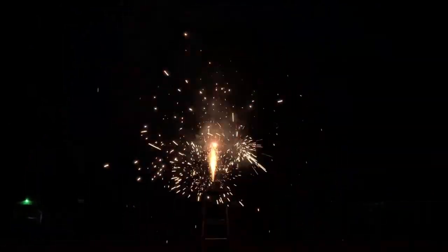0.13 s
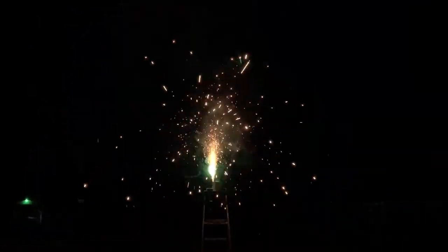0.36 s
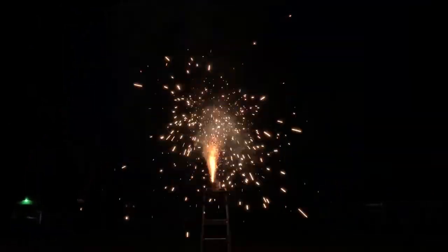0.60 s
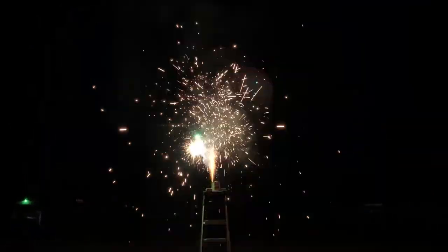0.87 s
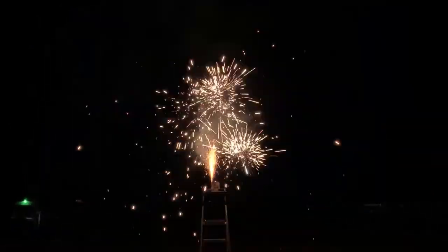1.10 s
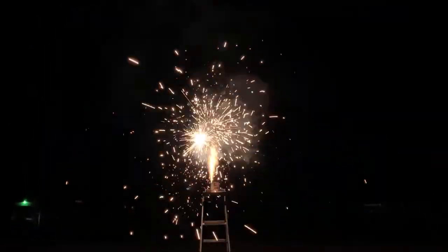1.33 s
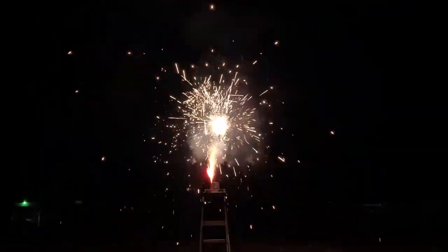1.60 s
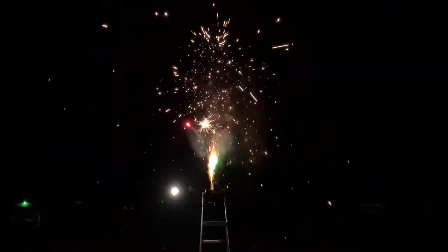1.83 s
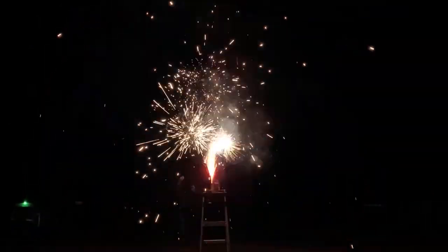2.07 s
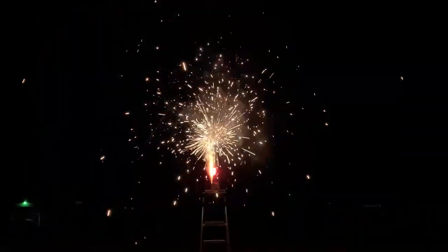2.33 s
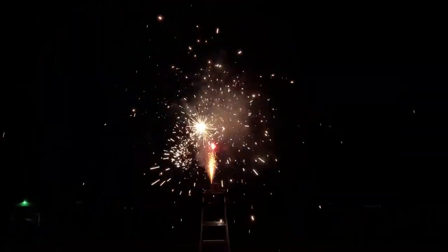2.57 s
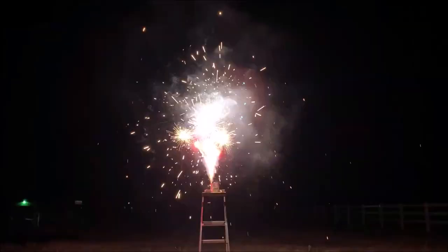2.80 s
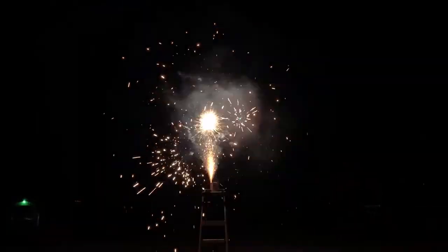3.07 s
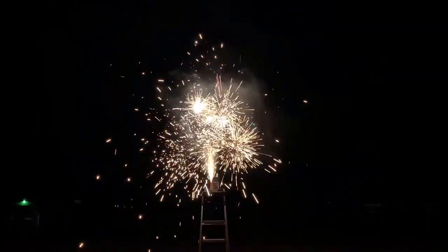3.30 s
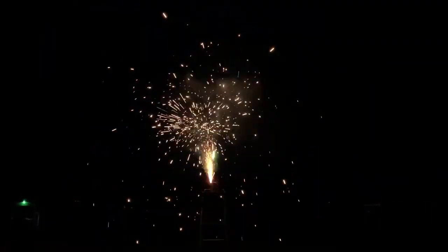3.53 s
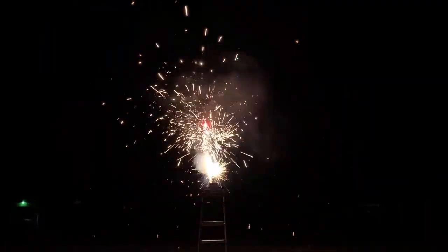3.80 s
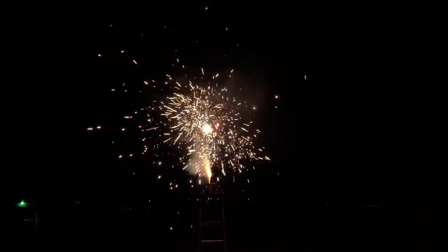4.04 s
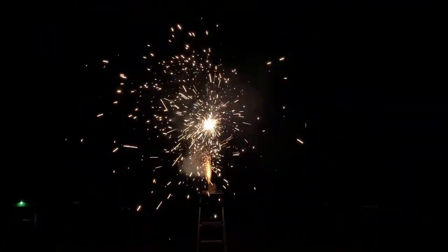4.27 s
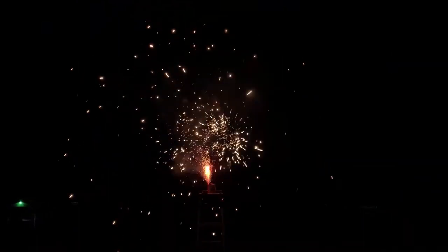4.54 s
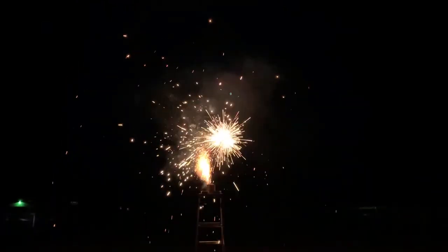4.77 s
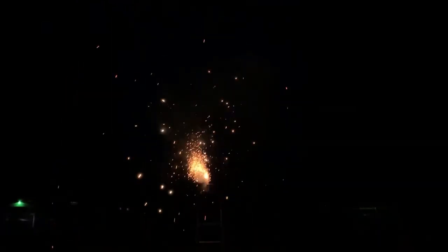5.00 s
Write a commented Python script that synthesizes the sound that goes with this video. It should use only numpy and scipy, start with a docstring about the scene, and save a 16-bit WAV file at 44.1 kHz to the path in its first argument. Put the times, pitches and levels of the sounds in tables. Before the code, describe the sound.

A crackling firework fountain is heard outdoors at night from some metres away, in stereo. From the first instant, sharp, dry, bright snaps come in irregular rapid fire, around forty a second, single or in tight clusters, varying from small ticks to hard loud cracks. Each is doubled by a ground bounce a few milliseconds later, too close to hear apart, with a brief scattered tail and a faint slap from walls about 65 milliseconds behind. Tiny shards tick quietly after some. Especially strong cracks come near 1.7, 2.9, 3.4 and 3.7 seconds. Soft bass thumps sit under the crackle at about 0.2, 0.4, 1.1, 1.4, 1.6, 2.5, 3.0 and 3.4. A thin, grainy, flickering hiss and very faint low roar continue far beneath. After 4.5 seconds the cracks are sparser; the last strong one comes at 4.98, then the hiss drops, leaving a fading echo and one tiny tick at 5.13.

```python
"""Crackling stars burst above a ground fountain firework at night, some metres from two microphones.
Each star is a sharp shock, heard straight and again off the ground 1-3 ms later; some throw a small shard
that pops just after. Nearby clutter scatters the shocks and two walls return them faintly.
Shaped noise makes a thin hiss and the low roar of the jet; filtered pulses make soft bass thumps.
The hiss thins slowly, then drops near the end as the fountain dies."""
import sys
import numpy as np
from scipy import signal
from scipy.fft import rfft, irfft, next_fast_len
from scipy.io import wavfile
from scipy.ndimage import uniform_filter1d, minimum_filter1d

SR = 44100
rng = np.random.default_rng(int(sys.argv[2]) if len(sys.argv) > 2 else 0)


def wav_out(sig):
    """Save sig, one row per channel (or a flat mono array), as 16-bit PCM at SR to the path in sys.argv[1]."""
    wavfile.write(sys.argv[1], SR, np.round(np.clip(np.atleast_2d(sig).T, -1, 1) * 32767).astype(np.int16))


def makeup_ratio(level_db):
    """Linear amplitude ratio for a level in decibels (20 dB per factor of ten)."""
    decades = np.asarray(level_db, float) / 20
    return 10 ** decades


N = 226223  # samples, about 5.1 s


def colour(points, hz):
    """Reads the columns of a table on a log-frequency axis."""
    f, *columns = np.transpose(points)
    return np.array([np.interp(np.log(hz + 1), np.log(f + 1), c) for c in columns])


def spikes(start_s, height):
    """An ideal shock is a one-sample pulse; this lays a train of them at the given moments."""
    train = np.zeros(N)
    at = np.round(start_s * SR).astype(int)
    inside = at < N
    np.add.at(train, at[inside], height[inside])
    return train


def shaped(noise, gain):
    """Colours noise by gain(hz) and evens it to rms 1."""
    size = next_fast_len(N)
    spectrum = rfft(noise, size) * gain(np.fft.rfftfreq(size, 1 / SR))
    out = irfft(spectrum, size)[..., :N]
    return out / np.sqrt(np.mean(out ** 2))


def band(x, lo_hz, hi_hz):
    """Gentle band-pass."""
    return signal.sosfilt(signal.butter(1, [lo_hz, hi_hz], "band", fs=SR, output="sos"), x)


# tone of the hiss: (pitch_hz, level_db), relative levels
HISS_TONE = [(300, 6.5), (1000, -15), (2200, 7), (7000, 1), (9200, -11), (13000, -20)]
# hiss of the sparks over time, before its flicker: (start_s, level_db)
HISS_LEVEL = [(0, -53.5), (4.95, -59), (5.05, -65)]


def jet():
    """The gas jet gives a faint lumpy roar, nearly mono; its sparks a wide, grainy, flickering hiss."""
    noise = rng.standard_normal((7, N))

    def roar_gain(hz):
        rise = (hz / 60) ** 4 / (1 + (hz / 60) ** 4)
        return rise / (1 + (hz / 150) ** 3)

    roar = shaped(noise[0] + 0.2 * noise[1:3], roar_gain)
    lumps = shaped(noise[3], lambda hz: 1 / (1 + (hz / 12) ** 2))
    flicker = shaped(noise[4], lambda hz: 1 / (1 + (hz / 60) ** 2))
    sparks = makeup_ratio(3.63 * rng.exponential(1, N))  # a few sparks snap louder than the rest
    hiss = shaped(sparks * noise[5:], lambda hz: makeup_ratio(colour(HISS_TONE, hz)[0]))
    hiss_db = np.interp(np.arange(N) / SR, *np.transpose(HISS_LEVEL))
    return makeup_ratio(-67.5 + 3.2 * lumps) * roar + makeup_ratio(hiss_db + 6.1 * flicker) * hiss


# bursting stars: (start_s, level_db, bounce_lag_ms)
# levels are relative strengths; a higher star has a longer lag off the ground
STAR_BURSTS = [(0.0255, -3.5, 1.93), (0.031, -1.8, 2.1), (0.1187, -3, 1.54), (0.143, 2, 1.66),
               (0.1773, -7, 1.83), (0.2366, -5.5, 1.64), (0.2385, -0.5, 1.25), (0.3152, -1, 1.63),
               (0.318, -8, 1.66), (0.3579, -0.5, 2.08), (0.362, -3, 1.57), (0.3736, -11, 1.9),
               (0.4009, 0.5, 1.9), (0.448, -2, 1.65), (0.5565, -2, 1.7), (0.5635, 2.5, 1.82),
               (0.5895, -4, 1.53), (0.599, -14, 1.6), (0.635, -1.5, 1.6), (0.6449, -11, 1.65),
               (0.657, -8.5, 2.3), (0.6713, 0, 2.03), (0.7498, -8, 2), (0.7722, -2, 2.07),
               (0.776, -6.5, 1.9), (0.8037, -1.5, 2.35), (0.812, -8.5, 2.2), (0.8143, 2.5, 1.55),
               (0.8743, -3, 1.98), (0.882, -8.5, 2.1), (0.8955, 0, 2.4), (0.9221, 1, 2.03),
               (0.9328, -2.5, 1.8), (0.9539, -1, 2.1), (0.9603, -6, 2), (0.9735, -2, 1.58),
               (1.003, -2.5, 1.62), (1.121, -3.5, 2.03), (1.1574, -1, 1.75), (1.1632, -0.5, 1.83),
               (1.194, -3.5, 2.1), (1.2128, 1.5, 2.22), (1.2163, -8, 1.8), (1.2865, -5, 1.6),
               (1.2931, -4, 1.5), (1.318, 1, 2.13), (1.3523, -12.5, 1.6), (1.3896, -10, 1.8),
               (1.3923, -4, 2.1), (1.4095, -1, 1.44), (1.417, -9, 1.9), (1.4206, 1, 1.8),
               (1.4463, -4.5, 1.86), (1.464, -5.5, 1.7), (1.5604, -7, 1.55), (1.563, -4.5, 1.9),
               (1.5808, -3, 1.5), (1.596, 2, 1.46), (1.628, 1, 1.7), (1.6535, -3, 2), (1.6605, -4.5, 1.7),
               (1.692, -15, 1.8), (1.7004, -4, 1.9), (1.71, 5, 1.9), (1.736, 4, 1.8), (1.7493, -6.5, 2.1),
               (1.757, -12, 1.6), (1.771, -3.5, 1.9), (1.8153, -2.3, 2.05), (1.8445, 1.5, 2.3),
               (1.8473, -1.5, 2.5), (1.8733, -13.5, 2.3), (1.9157, 1, 2.5), (1.9205, -5.5, 2.7),
               (1.959, -21, 2), (1.9752, -6, 1.08), (1.9853, -14.5, 2.5), (2.065, 1.5, 1.93),
               (2.1025, -8, 2.1), (2.1063, -8, 1.77), (2.14, 2, 2.12), (2.1611, -2, 2.4),
               (2.1824, -1.5, 1.86), (2.1996, -4, 1.73), (2.2036, -18, 2), (2.214, -1.5, 2.3),
               (2.2873, 0, 2.67), (2.299, -10, 2.2), (2.322, -5.5, 2.3), (2.3257, -4, 2.1),
               (2.3317, 1.5, 2.16), (2.3326, -10, 2.5), (2.335, -4.5, 1.8), (2.346, -7, 1.9),
               (2.3603, -7.5, 1.8), (2.373, -1.5, 2.2), (2.3781, -3.5, 2.37), (2.4044, -1.5, 2),
               (2.449, -3, 1.7), (2.502, -8.5, 2.1), (2.5172, -1.5, 2.3), (2.5286, -7, 2.46),
               (2.5315, 1, 1.76), (2.538, -4.5, 2.1), (2.5806, -10.5, 2.5), (2.612, -1, 2.2),
               (2.6384, -6.5, 1.84), (2.6416, -5.5, 1.97), (2.664, -3, 1.5), (2.6977, -12.5, 1.95),
               (2.73, -9.5, 1.9), (2.819, -3, 1.9), (2.828, -17, 1.8), (2.834, -5, 2), (2.8571, -1.5, 1.4),
               (2.8696, -7.5, 2.3), (2.8851, -6, 1.72), (2.929, -1.5, 1.77), (2.936, 5, 2.67),
               (2.938, 4, 1.9), (2.9405, -3.9, 0.83), (2.9604, -1.5, 1.8), (2.992, 2, 2),
               (3.021, 4.5, 1.75), (3.035, -1.5, 1.56), (3.112, 2.5, 2.3), (3.132, -6, 1.56),
               (3.1989, -2.5, 2), (3.2041, 0.5, 2.03), (3.2535, -4, 1.97), (3.2954, -1, 2.34),
               (3.3123, 0, 2), (3.3268, -15, 1.6), (3.3563, -2, 1.65), (3.3629, 0, 1.7),
               (3.3682, -3.5, 1.8), (3.3693, -9, 1.52), (3.3884, -2, 1.7), (3.395, 5, 1.62),
               (3.3956, -4, 1.3), (3.4161, 0, 1.7), (3.418, 3, 1.5), (3.428, -4, 1.9), (3.442, -14, 1.8),
               (3.4469, -2, 2), (3.4603, -2, 2.2), (3.5246, -2.8, 2.05), (3.5603, -4.5, 2.1),
               (3.5642, -2.5, 2.05), (3.582, -5, 2.2), (3.6094, -2, 1.92), (3.6308, -10, 1.9),
               (3.7, -0.8, 2.05), (3.7145, 5, 2.27), (3.7338, 1.5, 1.9), (3.7372, -3.5, 2.5),
               (3.752, 0.5, 2.05), (3.7739, 1.5, 2.37), (3.8335, -3, 1.57), (3.8443, 3, 1.67),
               (3.8609, -4.5, 2.1), (3.887, -3, 1.9), (3.8977, -9, 1.8), (3.904, -4.5, 2.1),
               (3.9108, -3, 2.17), (3.9304, -10, 1.4), (3.962, -4, 1.6), (3.992, -7, 1.7),
               (4.0366, 0, 2.16), (4.044, 1, 2), (4.068, -2, 1.9), (4.0983, -1.5, 1.94),
               (4.1026, -5.5, 1.6), (4.1206, -2.5, 2.1), (4.1358, -1.5, 2.02), (4.1389, -0.5, 1.6),
               (4.1714, -12.5, 1.7), (4.1871, -5, 2.2), (4.2326, 2, 2.0), (4.2345, -4, 2.0),
               (4.2722, 1.5, 2.2), (4.2747, -0.5, 2.36), (4.2759, -6, 1.6), (4.2971, -3, 2.26),
               (4.3075, -6, 1.8), (4.325, -6, 1.4), (4.3349, -5, 2.1), (4.3678, -4, 2), (4.392, 3, 1.4),
               (4.433, -5, 1.74), (4.445, -2, 1.87), (4.4469, -10, 1.6), (4.4969, -1, 1.6),
               (4.5577, -1.5, 1.8), (4.6085, -1.5, 1.8), (4.6842, 0, 1.95), (4.6943, -1.5, 1.62),
               (4.7053, -1, 1.7), (4.78, 2.5, 1.47), (4.818, 0.5, 1.75), (4.8523, -11.5, 1.7),
               (4.8905, 1, 1.78), (4.926, -4, 1.93), (4.9774, -1, 1.54), (5.126, -23, 1.3)]


def bursts(shard_share=0.42, shard_db=-31.5, shard_wait_s=0.013):
    """The stars, and the small shards that some of them throw, at the same height."""
    start_s, level_db, lag_ms = np.transpose(STAR_BURSTS)
    throws, chance = rng.random((len(start_s), 2)).T
    pop_db = np.where(throws < shard_share, level_db + shard_db, -np.inf)
    pop_s = start_s - shard_wait_s * np.log(1 - chance)  # exponential waits, mean shard_wait_s
    return np.r_[start_s, pop_s], np.r_[level_db, pop_db], np.r_[lag_ms, lag_ms]


def stars(dull_per_db=0.0174, soil_middle=0.43, soil_treble=-0.19):
    """Each shock and its ground bounce; a bigger star is duller, and direction tips the middle left or right."""
    start_s, level_db, lag_ms = bursts()
    bounce_chance, lean, aim, body = rng.standard_normal((len(start_s), 4)).T
    bounce_s = start_s + lag_ms / 1000
    size = makeup_ratio(level_db)
    bounce = makeup_ratio(level_db + 0.87 + 1.12 * bounce_chance)
    dull = 0.27 * lean + dull_per_db * np.maximum(level_db, -20)

    def both(weight):
        """Straight shock plus bounce."""
        return spikes(start_s, weight * size) + spikes(bounce_s, weight * bounce)

    aimed = both(aim)
    side = 0.24 * band(aimed, 2350, 7200) + 0.24 * band(aimed, 110, 550)
    # the ground returns more middle and less treble: shares of the bounce
    ground = spikes(bounce_s, bounce)
    soil = soil_middle * band(ground, 1350, 5400) + soil_treble * band(ground, 6200, 17500)
    # every star has its own middle
    unlike = band(both(dull), 570, 3600) + band(both(0.18 + 0.25 * body), 1240, 3700)
    return both(0.94) + soil + unlike + np.array([side, -side])


def scatter(x, near_db=-12, near_t60=0.026, far_db=-12.0, far_t60=0.49, swell_db=-13, swell_s=0.0665,
            width_s=0.012):
    """Ground litter and the stand scatter at once; the yard faintly, with a swell near the walls' delay."""
    t = np.arange(SR // 3) / SR
    out = np.zeros((2, N))
    yard = makeup_ratio(far_db - 60 * t / far_t60) * (1 - np.exp(-t / 0.0047))
    yard += makeup_ratio(swell_db) * np.exp(-((t - swell_s) / width_s) ** 2)
    near_fade = makeup_ratio(-60 * t / near_t60) * (1 - np.exp(-t / 0.00038))
    turn = np.arange(N) // 331 % 8  # 7.5 ms each
    for k in range(8):  # several tails in turn keep the bursts unlike
        # sparse random reflections: shared near, near left and right, far left and right
        present = rng.random((5, len(t))) < [[0.04]] * 3 + [[0.006]] * 2
        taps = rng.standard_normal((5, len(t))) * present
        near = band(0.44 * taps[0] + taps[1:3], 450, 9400) * near_fade
        far = band(taps[3:], 430, 6400) * yard / np.sqrt(SR / 1000)
        tail = makeup_ratio(near_db) * near / np.linalg.norm(near[0]) + far
        out += signal.fftconvolve((x * (turn == k))[None], tail, axes=1)[:, :N]
    return out


# walls round the yard: (delay_ms, spread_ms, level_db, bounce_lag_ms, top_hz, right_db)
# the bounce grazes the ground; right_db is added on the right and taken off the left
YARD_WALLS = [(56.2, .7, -35, 0.32, 22000, -9), (64.96, .5, -16.5, .43, 6100, -0.5)]


def walls():
    """Each wall returns a faint double slap, the earlier one bright, the later one duller;
    where the star bursts shifts its delay and strength."""
    start_s, level_db, _ = np.transpose(STAR_BURSTS)
    out = np.zeros((2, N))
    for delay_ms, spread_ms, wall_db, lag_ms, top_hz, right_db in YARD_WALLS:
        shift, chance = rng.standard_normal((len(start_s), 2)).T
        slap_s = start_s + (delay_ms + spread_ms * shift) / 1000
        size = makeup_ratio(wall_db + 1.1 * level_db + 1.6 * chance)
        slap = spikes(slap_s, size) + spikes(slap_s + lag_ms / 1000, size)
        wall_slap = band(slap, 30, top_hz) + 1.74 * band(slap, 268, 530)
        out += wall_slap * makeup_ratio(np.array([[-right_db], [right_db]]))
    return out


# low thumps, perhaps coughs of the jet: (start_s, level_db), level of the pulse before the low-pass
THUMPS = [(.18, 18), (0.396, 15), (1.099, 16), (1.42, 15.5), (1.629, 17), (2.53, 9), (2.994, 19),
          (3.394, 15)]


def thumps(top_hz=85):
    """Each thump is one soft push of air, a pulse low-passed until it is all bass."""
    start_s, level_db = np.transpose(THUMPS)
    low_pass = signal.butter(2, top_hz, fs=SR, output="sos")
    return signal.sosfilt(low_pass, spikes(start_s, makeup_ratio(level_db)))


# colour of a shock at the two microphones, before shock_db: (pitch_hz, left_db, right_db)
MIC_COLOUR = [(22, -52, -45), (51.3, -7.5, -6.5), (86.5, -3.5, -3.5), (270, -2.5, 4), (427, 2, 0.5),
              (481, -4, -1.5), (890, 5.5, 4), (1810, 1, 2), (2180, 4, 7), (3180, -0.5, 2.5), (4100, -1, 3),
              (6300, 1.5, 3.5), (9150, 5, 5.5), (11670, 2.5, 1.5), (14970, -4, -3), (16080, -23, -5),
              (17200, -67.5, -50)]
# band splits that delay the bass: (split_hz, sharpness_q)
BAND_SPLITS = [(45, 0.75), (140, 0.81), (385, 0.68)]
# above the corner the treble arrives early; rows left, right: (corner_hz, lead_below_ms, lead_above_ms)
TREBLE_LEADS = [(6740, 0.021, 0.1303), (7115, -.035, 0.315)]


def microphones(x, shock_db=-2.15, size=16384):
    """Minimum-phase colour of each microphone, bass held back by all-pass splits, early treble."""
    hz = np.fft.rfftfreq(size, 1 / SR)
    log_gain = np.log(makeup_ratio(colour(MIC_COLOUR, hz) + shock_db))
    mirrored = np.hstack([log_gain, log_gain[:, -2:0:-1]])
    phase = -signal.hilbert(mirrored).imag[:, :len(hz)]
    for split_hz, q in BAND_SPLITS:
        phase -= 2 * np.arctan2(hz / split_hz / q, 1 - (hz / split_hz) ** 2)
    corner_hz, below_ms, above_ms = np.transpose(TREBLE_LEADS)[:, :, None]
    lead = below_ms * np.minimum(hz, corner_hz) + above_ms * np.maximum(hz - corner_hz, 0)
    phase += 2 * np.pi * lead / 1000
    # 64 samples of room for the early treble, taken off again after filtering
    response = irfft(np.exp(log_gain + 1j * phase), size)
    response = np.roll(response, 64, axis=1)[:, :size // 2]
    return signal.fftconvolve(x, response, axes=1)[:, 64:N + 64]


def scene():
    """Shocks with their scatter, echoes and thumps at the microphones, over the jet."""
    shocks = stars()
    scattered = scatter(shocks.mean(0))
    return microphones(shocks + scattered + walls() + thumps()) + jet()


def top_cut(x):
    """Nothing passes above the cut-off."""
    return signal.sosfilt(signal.butter(12, 16970, fs=SR, output="sos"), x)


def record(dry, ceiling_db=-6.0, ratio=4):
    """A quick limiter, linked across both channels, holds the loudest bursts."""
    peak_db = 20 * np.log10(abs(dry).max(0) + 1e-9)
    fall_db = np.arange(N) * 900 / SR  # the held peak falls 900 dB a second
    held_db = np.maximum.accumulate(peak_db + fall_db) - fall_db
    over_db = np.maximum(held_db - ceiling_db, 0)
    widest_db = -minimum_filter1d(-over_db, size=41)  # looks half a millisecond ahead
    ahead_db = uniform_filter1d(widest_db, size=21)
    limited = dry / makeup_ratio((1 - 1 / ratio) * ahead_db)
    return top_cut(limited)


dry = scene()
out = record(dry)
wav_out(out)
```